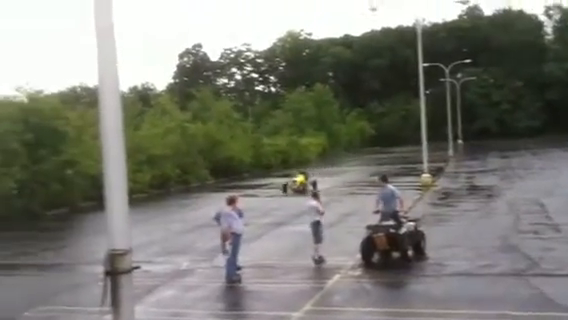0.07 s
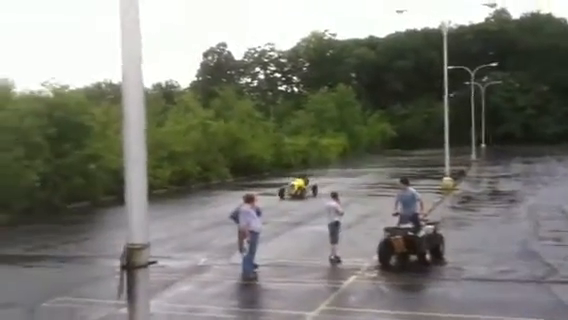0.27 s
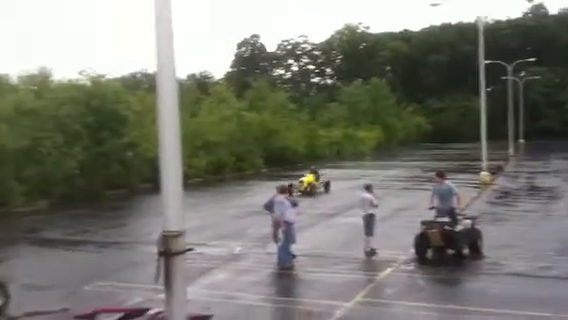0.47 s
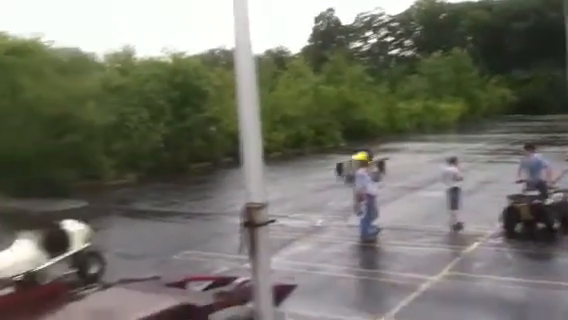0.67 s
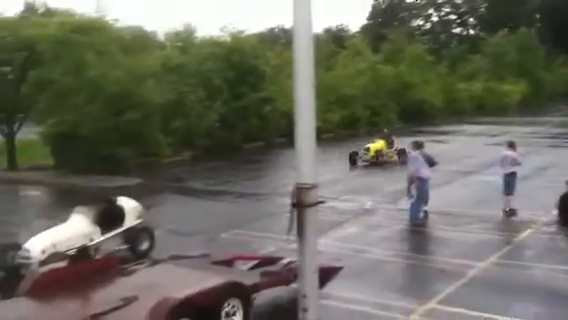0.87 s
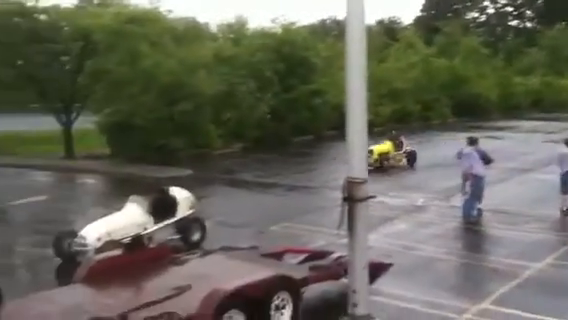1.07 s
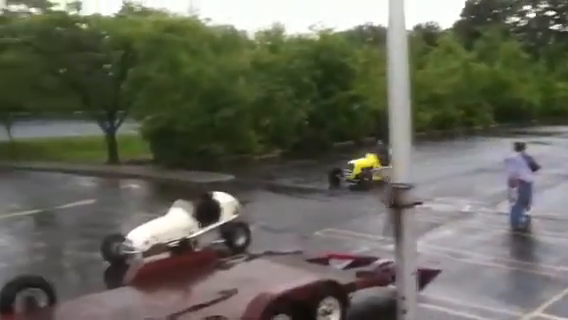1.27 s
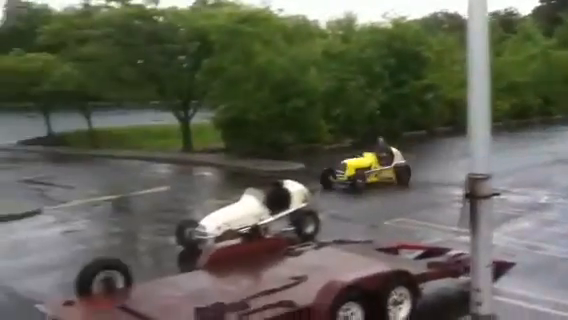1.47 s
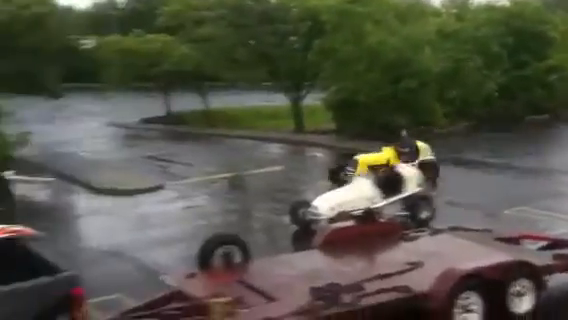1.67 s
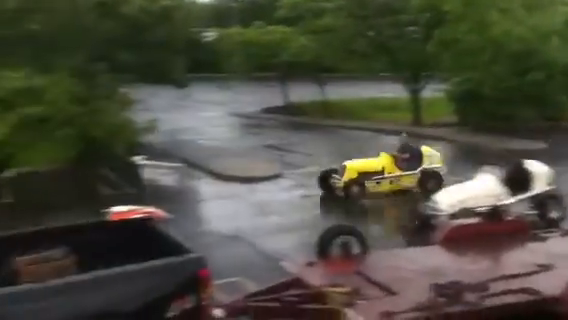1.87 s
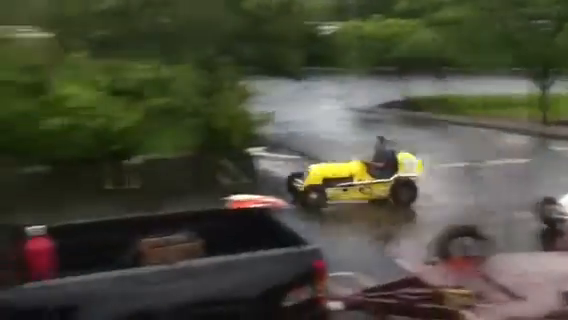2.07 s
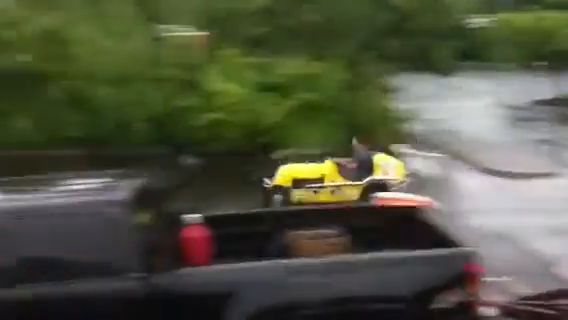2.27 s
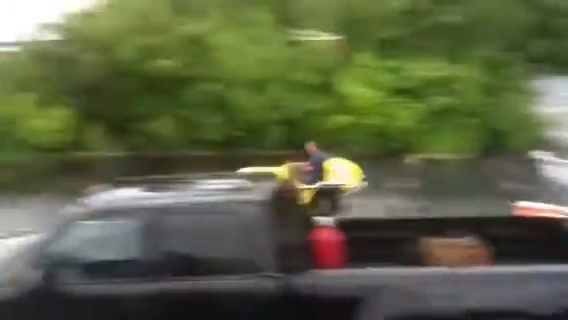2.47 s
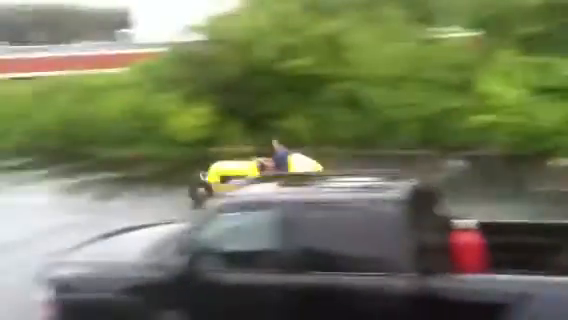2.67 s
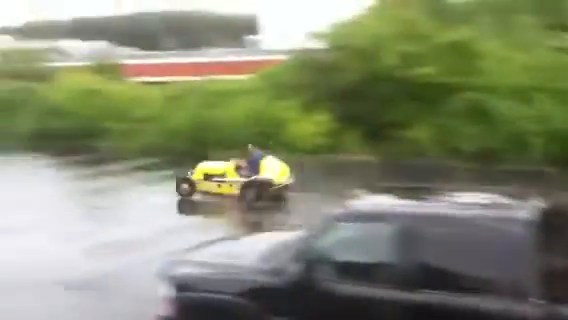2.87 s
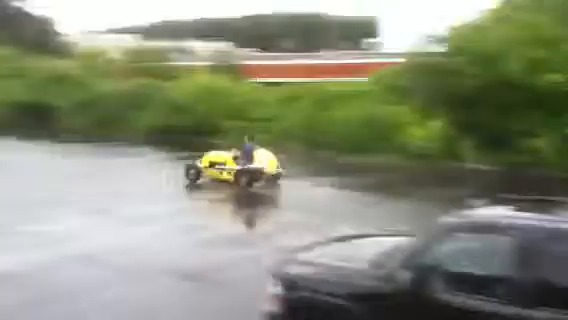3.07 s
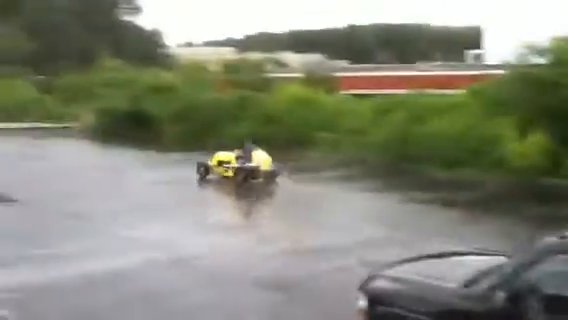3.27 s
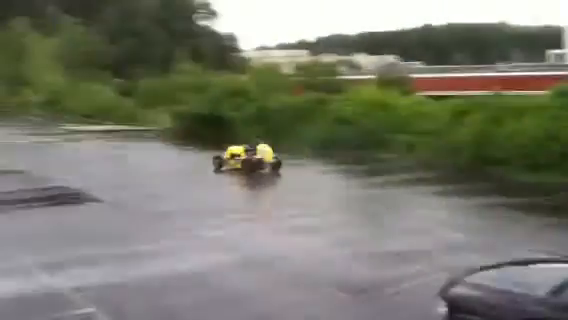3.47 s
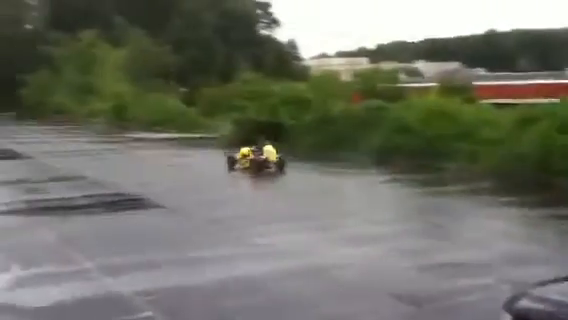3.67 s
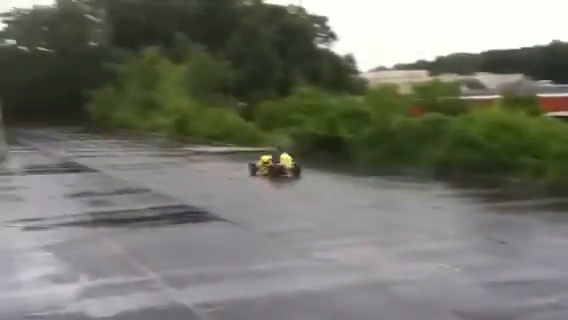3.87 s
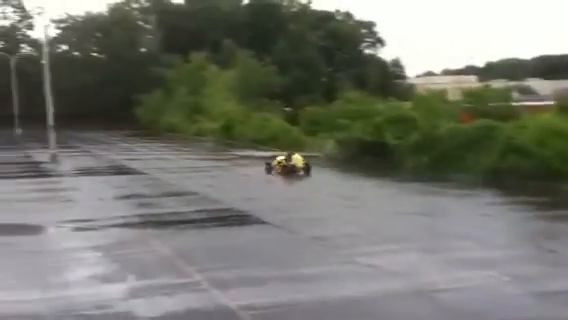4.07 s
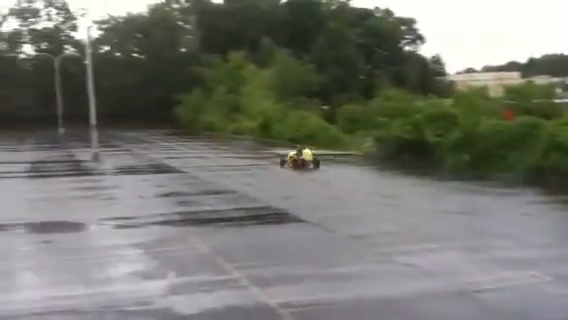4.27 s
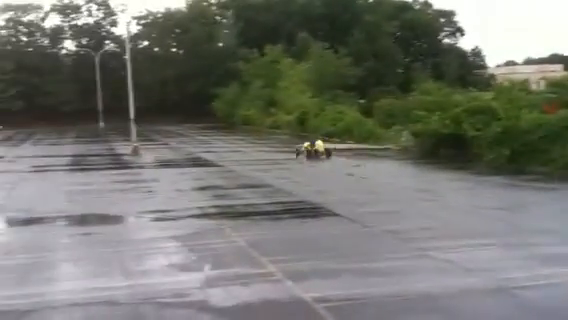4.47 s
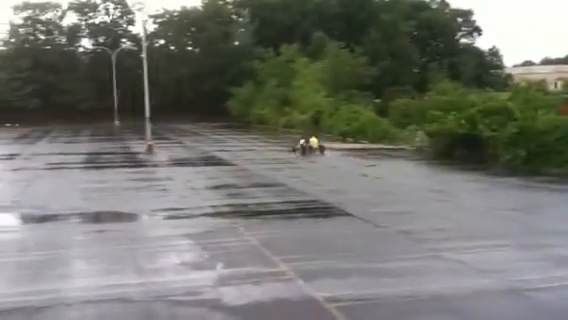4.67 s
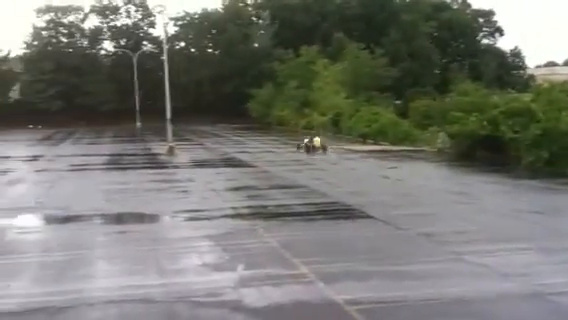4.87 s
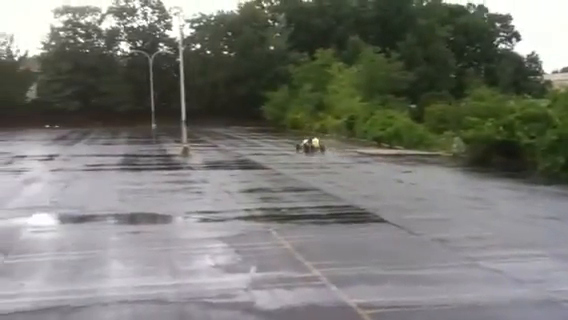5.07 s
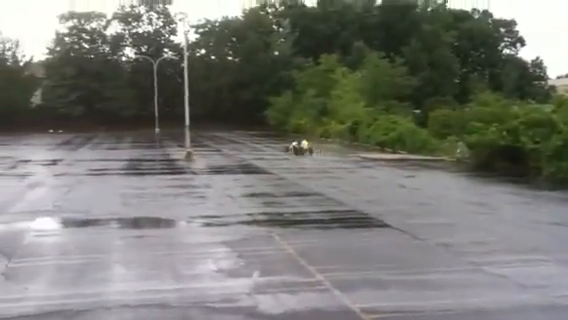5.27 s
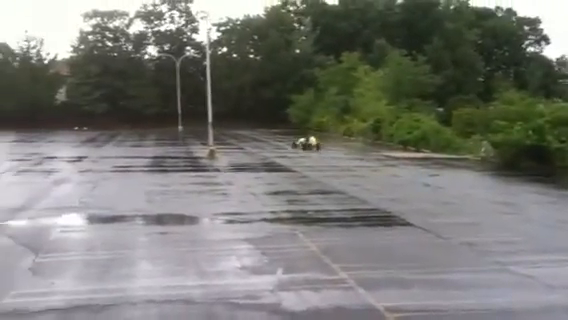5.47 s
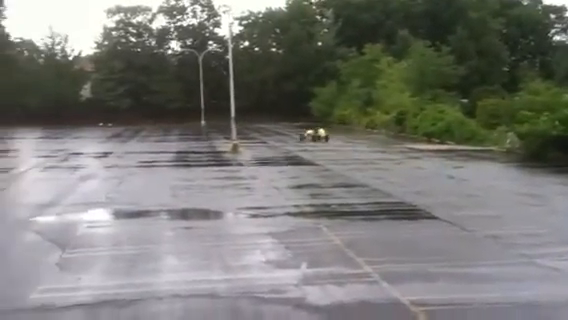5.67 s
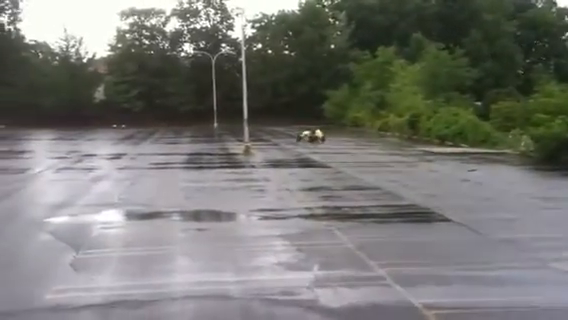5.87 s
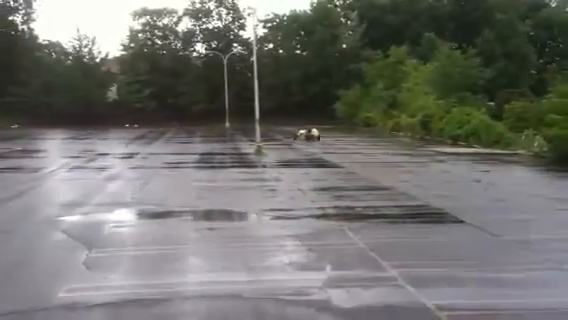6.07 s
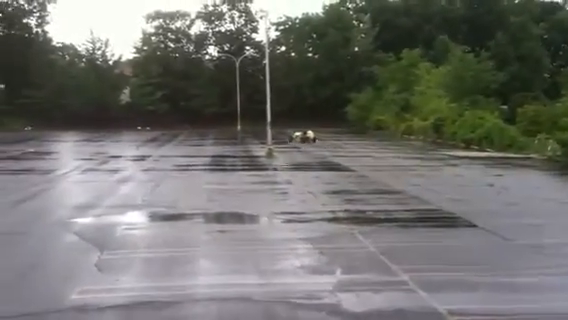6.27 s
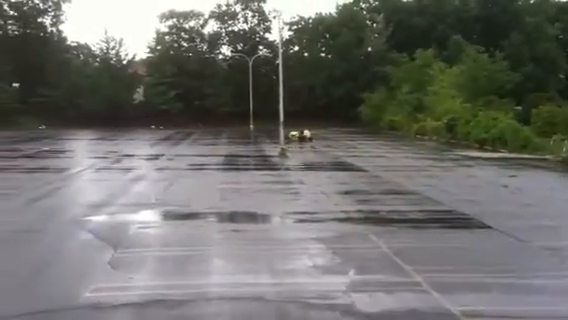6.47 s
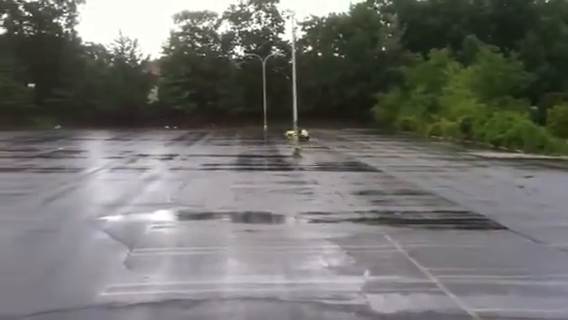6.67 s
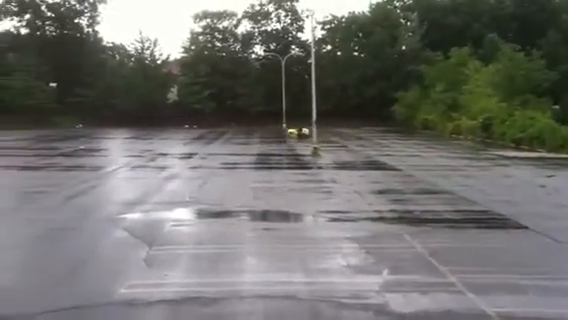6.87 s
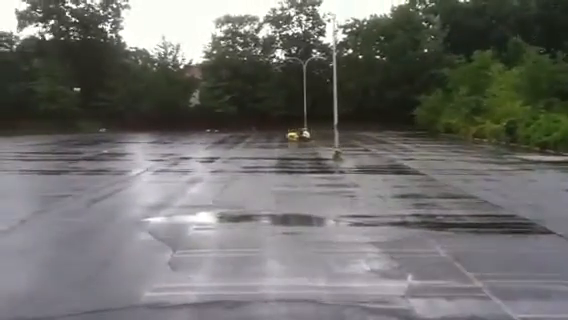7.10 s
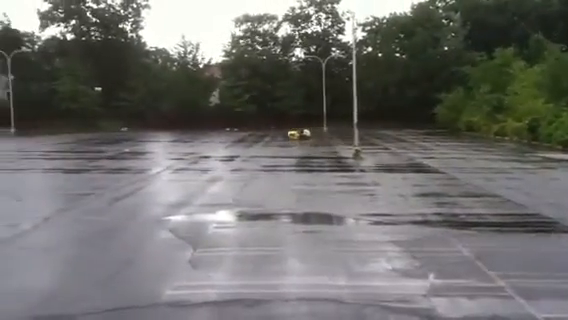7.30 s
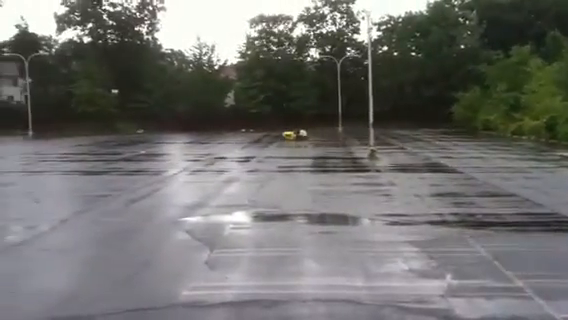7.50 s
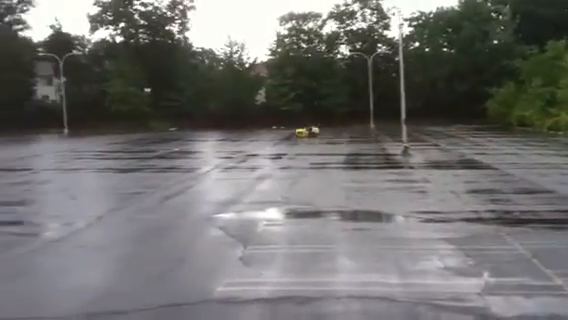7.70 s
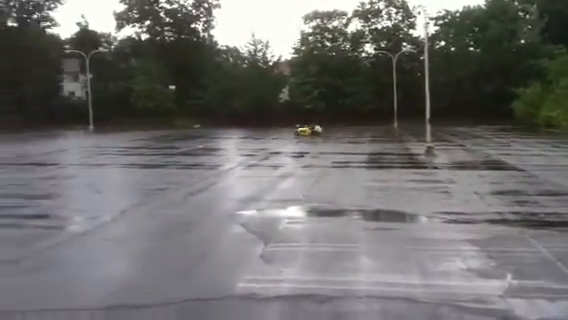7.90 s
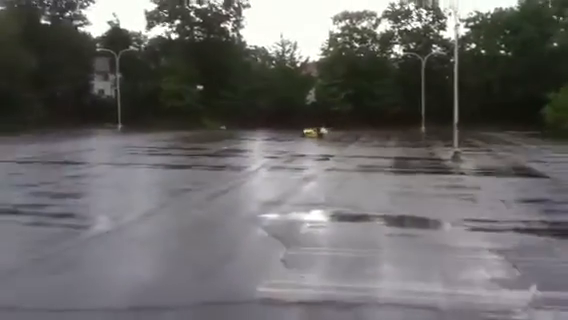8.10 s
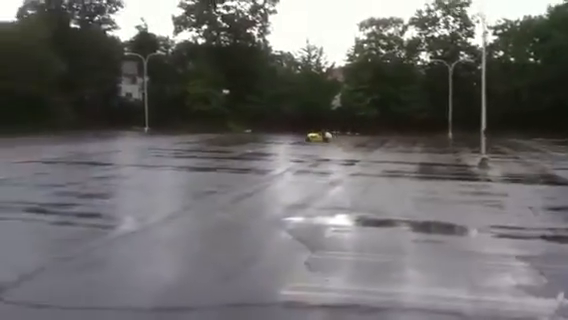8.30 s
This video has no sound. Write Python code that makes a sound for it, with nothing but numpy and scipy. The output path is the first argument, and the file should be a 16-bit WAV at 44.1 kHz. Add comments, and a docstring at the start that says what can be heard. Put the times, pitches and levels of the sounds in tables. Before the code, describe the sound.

A low, uneven exhaust note grows quickly, stumbles briefly, and snarls by at moderate distance, tyres hissing through water. A cluster of afterfire pops and a puddle slap follow. The engine drops in speed on a hollow, ragged overrun with thin metal tinks, settling into a quiet lumpy idle-like throb, tappets tapping and a faint whine. Open wet lot, mono, thin deep bass, short diffuse echoes.

```python
"""A small open race car with a lumpy eight-cylinder engine comes nearer on a wet, tree-lined parking lot.
It passes with rattling valve gear and hissing tyre spray, lifts off with pops in the exhaust, then burbles
away near idle with ticking tappets. Exhaust orders are summed cosines; rasp, ticks, spray and pops are
impulses and noise shaped by filters. Echoes and a ground reflection lead to one microphone, some way off."""
import sys
import numpy as np
from scipy import signal
from scipy.fft import rfft, irfft
from scipy.io import wavfile
from scipy.ndimage import uniform_filter1d

SR = 44100
rng = np.random.default_rng(int(sys.argv[2]) if len(sys.argv) > 2 else 0)


def wav_record(signal):
    """Record a signal, one row per channel, as 16-bit PCM in the file named by sys.argv[1]."""
    frames = np.transpose(np.atleast_2d(signal))
    bounded = np.clip(frames, -1, 1)
    # unit amplitude maps onto the largest positive 16-bit level
    quanta = np.round(bounded * 32767).astype(np.int16)
    wavfile.write(sys.argv[1], SR, quanta)


N = 367794
T = np.arange(N) / SR

# Engine speed as heard. Each row: time in seconds, four-stroke cycles per second.
ENGINE_SPEED = [(0.0, 14.15), (0.75, 15.04), (1.5, 15.92), (1.8, 16.13), (2.0, 15.85), (2.25, 15.84),
                (3.0, 15.61), (3.6, 14.54), (4.2, 13.97), (4.65, 13.38), (5.1, 13.13), (5.5, 12.19),
                (6.0, 10.24), (6.4, 10.02), (6.8, 10.03), (7.15, 9.88), (8.0, 9.97), (8.34, 10.05)]
RATE = np.interp(T, *np.transpose(ENGINE_SPEED))  # engine cycles per second
CYCLES = np.cumsum(RATE) / SR  # engine cycles so far
IDLE_CYCLES_PER_S = 10.4
REFERENCE_M = 14  # distance at which source levels and the ground detour are stated

# Cylinders in firing order. Each row: strength in dB, travel time down the header in ms.
CYLINDERS = [(-4, 0.34), (-3, 2.155), (-8, 1.764), (0, 2.42), (-8, 0.27), (0.5, 1.444), (2, 1.963),
             (-1, 3.94)]


def firings(jitter_s=0.00036, count=8):
    """Pulse train: unequal cylinder strengths and header delays make the beat lope."""
    k = np.arange(1, int(CYCLES[-1] * count))
    db, header_ms = np.array(CYLINDERS)[k % count].T
    times = np.interp(k / count, CYCLES, T) + header_ms / 1000
    return times + jitter_s * rng.standard_normal(len(k)), undb(db)


# Which note is heard. Each row: time in seconds, stage (0 coming, 1 pulling, 2 abreast, 3 passing,
# 4 leaving, 5 coasting, 6 distant; fractions blend neighbours).
STAGES = [(0, 0), (.7, 0), (1.25, 1), (1.75, 1), (2.05, 2), (2.28, 2), (2.48, 3), (2.95, 3), (3.45, 4),
          (3.95, 4), (4.25, 5), (5.3, 5), (5.85, 6)]
# Exhaust spectrum at each stage: relative dB of engine orders 4 to 28 (order 8 is the firing rate).
COMING = [-42, -19, -31, -24, -2, -17, -4.5, -7, -12.5, -6, -6, -5.5, 1.5, -3, -13.5, -2, -4, -12.5, -15,
          -16, -21.5, -31, -28, -35, -30.0]
PULLING = [-27, -14.5, -25.5, -17.5, -2, -10.5, -2.0, -4, -2, -2, -9, -6, -1.5, -7, -5, -9, -12, -11, -17,
           -11.5, -34, -34.5, -25.5, -24.5, -29]
ABREAST = [-29.5, -22.5, -37, -25, -5.5, -15.5, -5.5, -28, -2, -1, -5.0, -14.5, -7.5, -17, -16.5, -22.5,
           -27.5, -22.0, -23.5, -26.5, -28, -31, -33, -39.5, -35]
PASSING = [-21, -12.5, -30.5, -22, -2, -6.0, -2.5, -11.5, -0.5, -0.5, -7, -25.5, -15.5, -23, -24, -29, -24,
           -24.5, -16.5, -35, -22.5, -40, -38.0, -30, -40.5]
LEAVING = [-43, -42.0, -32, -20, -7.5, -17.5, -8, -14.5, -11.5, -12.5, -3.0, -4, -6, -0.5, -5, -11.0, -13.5,
           -25.5, -16, -33.0, -25.5, -43, -26.5, -22, -32.5]
COASTING = [-49, -32.0, -32, -31, -6.5, -5.5, -0.5, -18.5, -14.5, -4.5, -10, -4, -10.5, -1.5, 0.5, 1, -9.5,
            -7.5, -20, -22, -14.5, -18.5, -16, -33, -28.0]
DISTANT = [-53.0, -43.5, -47, -42.5, -20, -33, -21, -21.5, -34.5, -17, -21, -11.5, -6.5, -7.5, 0.0, -10.5,
           -9.5, -19, -15.5, -7.5, -9, -9.5, -15, -23.5, -18.5]
# Coasting, firings repeat only every second cycle: relative dB of half orders 7.5 to 25.5.
HALF_ORDERS = [-26.5, -16, -11.5, -7.5, -4, -14.5, -8, 1.5, -8.5, -1, -4, -2.5, -9.5, -15, -14.5, -21, -27,
               -17, -16]


def exhaust_note(pipe_ms=6, waver_db=2.5, count=8):
    """Fourier synthesis: wavering engine orders, their phases set by the firing pattern."""
    stage = curves(STAGES)[0]
    db, header_ms = np.transpose(CYLINDERS)
    arrival = np.arange(count) / count + (header_ms + pipe_ms) / 1000 * RATE[0]  # in turns
    spectra = zip(COMING, PULLING, ABREAST, PASSING, LEAVING, COASTING, DISTANT)
    orders = []
    for k, levels in enumerate(spectra, 4):
        orders.append((k, np.interp(stage, np.arange(len(levels)), undb(levels))))
    coasting = np.maximum(1 - np.abs(stage - 5), 0)
    for k, level in enumerate(HALF_ORDERS, 7):
        orders.append((k + .5, coasting * undb(level)))
    note, power = 0, 0
    for order, gain in orders:
        pattern = np.sum(undb(db) * np.exp(-2j * np.pi * order * arrival))
        gain = gain * undb(waver_db * drift())
        note = note + gain * np.cos(2 * np.pi * order * (CYCLES - 1) + np.angle(pattern))
        power = power + gain ** 2 / 2
    return note / np.sqrt(power)


# The two cylinder banks beat once a cycle. Each row: time in seconds, swing either way in dB,
# place of the swell in the cycle in turns.
LOPE = [(0, 1.1, 0.87), (1.6, 2, 0.94), (2.1, 1.7, 1), (2.33, 5.5, 1.08), (2.5, 1.1, 0.63),
        (2.75, 2.5, 0.72), (3.5, 0.6, 0.49), (5.0, 0.55, 0.73), (5.7, 0.58, 0.5), (6.2, 0.62, 0.65),
        (8.34, 0.54, 0.61)]


def lope():
    """Amplitude modulation: a throb that comes round once per engine cycle."""
    swing_db, place = curves(LOPE)
    return steady(undb(swing_db * np.cos(2 * np.pi * (CYCLES - place))))


# Uneven combustion, ragged when the throttle changes and on the overrun.
# Each row: time in seconds, amplitude share of the burble from 0 to 1.
RAGGED = [(0, .27), (.8, .35), (1.4, .52), (1.7, .67), (2.0, .6), (2.15, .35), (3.0, .38), (3.2, .75),
          (3.5, .27), (4.0, .3), (4.3, .56), (5.2, .56), (5.7, .72), (6.2, .58), (8.34, .53)]
# Pipe resonances: near, distant, and hollow on the overrun. Each row: frequency in Hz, gain in dB.
PIPE = [(30, -50), (60, -31), (90, -23.5), (120, -6.5), (165, -7), (200, 3), (245, -5), (305, -11.5),
        (350, -13.5), (400, -20.5), (450, -36), (600, -44), (1000, -84.5)]
PIPE_DISTANT = [(30, -37), (60, -33), (90, -13.5), (125, -7), (150, 1.5), (178, 0), (208, -7.5),
                (240, -1.5), (275, -9.5), (305, -11), (350, -17), (400, -20), (450, -45), (600, -34),
                (1000, -87)]
PIPE_HOLLOW = [(200, -34), (290, -11.5), (330, 2.5), (365, -9), (420, -17), (560, -23.5), (1000, -62.5)]


def exhaust(times, sizes, db, hollow_db=-13):
    """Periodic plus random excitation: a steady note, burble of uneven firings, hollow overrun resonance."""
    uneven = lot(clicks(times, sizes * rng.standard_normal(len(times))), echo_db=2.5)
    far = np.clip(curves(STAGES)[0] - 5, 0, 1)
    near_burble = (1 - far) * unit(colour(uneven, PIPE))
    far_burble = far * unit(colour(uneven, PIPE_DISTANT))
    burble = steady(near_burble + far_burble, span_s=0.11)
    share = np.clip(curves(RAGGED)[0], 0, .95)
    sound = np.sqrt(1 - share ** 2) * exhaust_note() + share * burble
    hollow = undb(hollow_db) * overrun() * steady(colour(uneven, PIPE_HOLLOW))
    return steady((sound + hollow) * lope()) * undb(db)


# Upper ring of the pipe. Each row: frequency in Hz, gain in dB.
RASP = [(150, -43.5), (300, -23.5), (430, 4.5), (560, 2), (680, 6), (860, -0.5), (1020, -26), (1500, -34.5),
        (4000, -39), (12000, -78.5)]


def rasp(pulses, db, gas_share=1.27, bark_db=-2, hard_db=-1.5, hard_place=.47):
    """Resonance and turbulence: the pipe's upper ring with a puff of gas after each firing."""
    blast = unit(pulses) + gas_share * unit(fade(pulses, decay_s=0.0061) * noise())
    # one cylinder barks louder
    hard = undb(hard_db) * unit(beats(hard_place, scatter_db=0))
    throat = [(400, -46.5), (680, 0.5), (780, -2.0), (900, -3.0), (1050, -24.5), (2000, -47.0)]
    bark = unit(colour(blast + hard, throat))
    # the throaty band opens while the tailpipe points at the listener
    facing = np.interp(T, [1.9, 2.3, 2.75, 3.1, 6.8, 7.8], [0.3, 0.85, 2.0, 0, 0.66, 0.6])
    sound = unit(colour(blast, RASP)) + undb(bark_db) * facing * bark
    return steady(lot(ground(sound, bounce=0.02), echo_db=-1.5)) * undb(db)


def chuff(near_db=2.0, far_db=3.0, place=0.53):
    """Amplitude modulation: dB swing of the upper ring once a cycle, deepest near idle."""
    swing_db = np.where(RATE < IDLE_CYCLES_PER_S, far_db, near_db)
    return swing_db * np.cos(2 * np.pi * (CYCLES - place))


# A bright snarl as the car sweeps by. Each row: centre time in seconds, length in seconds, level in dB,
# centre in Hz, glide in Hz per second, width in Hz, places of the hardest and the second hardest spit
# in the cycle in turns.
SNARLS = [(1.383, .7, -70, 2303, -400, 1090, .40, 0.17), (1.702, .35, -64, 1847, -1300, 800, .40, 0.19),
          (2.25, .4, -65, 2000, -600, 1100, .46, .87), (2.9, .7, -61, 2010, -200, 370, .12, .89),
          (2.92, 0.36, -70, 2805, -200, 300, 0.18, .89), (3.7, .55, -72.5, 2080, -200, 785, .59, 0.45),
          (5.062, 0.19, -77, 1985, -0.5, 1410, 0.65, 0.43)]


def snarl(pulses, gate_s=0.0056, second_db=-2, others_db=-6, scatter_db=-1.5, order=2):
    """Gliding resonance: gas noise gated by firings, two cylinders spitting harder than the rest."""
    out = 0
    for s, length, db, hz, glide, width, first, second in SNARLS:
        low_pass = signal.butter(order, width / 2, fs=SR, output="sos")
        band = unit(signal.sosfilt(low_pass, noise()))
        gate = unit(beats(first, scatter_db)) + undb(second_db) * unit(beats(second, scatter_db))
        gate = gate + undb(others_db) * unit(pulses)
        centre = hz + glide * np.clip(T - s, -length, length)
        carrier = np.cos(2 * np.pi * np.cumsum(centre) / SR)
        swell = np.exp(-(2 * (T - s) / length) ** 2)
        out = out + undb(db) * swell * unit(band * puff(gate, decay_s=gate_s) * carrier)
    return lot(out, echo_db=-10.5)


# Short dry spits from the exhaust, many once per engine cycle.
# Each row: time in seconds, drive in dB, nominal pitch in Hz.
SPITS = [(1.663, -61, 2080), (1.801, -58, 1530), (2.057, -49.5, 1660), (2.118, -48.5, 1680),
         (2.183, -60, 1840), (2.24, -50.5, 1640), (2.298, -53.5, 1460), (2.476, -55, 1450),
         (2.608, -55.5, 990), (2.652, -55, 2100), (2.972, -58, 1840), (3.051, -48.5, 1590),
         (3.1, -59, 2050), (6.657, -62, 1970), (6.755, -63, 1950)]


def spits():
    """Enveloped noise: short band-shaped bursts from the exhaust."""
    out = 0
    for s, db, hz in SPITS:
        outline = [(hz / 3, -40), (hz * 0.92, -8), (hz, 0), (hz * 0.94, -8), (hz * 2, -24),
                   (hz * 5, -55), (hz * 8, -80)]
        band = unit(colour(noise(), outline))
        out = out + undb(db) * band * puff(clicks(np.array([s]), np.ones(1)), decay_s=0.016)
    return out


# Unburnt fuel popping in the pipe. Each row: time in seconds, then crack, bark and thump drive in dB.
POPS = [(2.012, -69, -82.5, -48), (2.897, -55, -73, -56), (2.924, -55, -61, -47), (3.128, -65, -50.5, -40),
        (3.139, -54, -68, -25.5), (3.165, -75, -63, -27), (3.233, -56, -54, -51),
        (3.268, -59.5, -67, -28.5), (3.301, -58, -70, -50), (3.339, -54, -58, -23.5),
        (3.365, -62, -57, -38), (4.103, -73, -58.5, -31), (4.237, -69, -55, -34.5), (4.318, -68, -67, -38),
        (4.463, -63, -55.5, -28), (4.61, -73, -58, -34), (5.062, -66, -61, -53), (5.205, -69, -62, -45),
        (5.367, -76, -60.5, -50), (5.563, -70, -59, -46)]
# Spectrum of the crack. Each row: frequency in Hz, gain in dB.
CRACK = [(700, -4.5), (2000, 13.5), (3600, 1.5), (5400, 9), (6800, 1), (9200, 7.5), (10500, -23),
         (15000, -29)]


def pops(rise_s=0.00058):
    """Impulsive combustion: each afterfire flares at the tailpipe, barks and thumps the pipe."""
    s, crack_db, bark_db, thump_db = np.transpose(POPS)
    flare = uniform_filter1d(fade(clicks(s, undb(crack_db)), decay_s=0.0048), int(2 * rise_s * SR))
    crack = flare * unit(colour(noise(), CRACK))
    body = [(50, -34), (110, -30.0), (145, 11.5), (185, -5), (225, 4.0), (280, -12.0), (345, -9),
            (410, -23), (600, -40.5), (1000, -55.5), (4000, -100)]
    note = colour(np.eye(1, N)[0], body)  # impulse response of the pipe
    thump = signal.fftconvolve(clicks(s, undb(thump_db)), note / np.max(np.abs(note)))[:N]
    mouth = [(300, -19.5), (480, -0.5), (700, -4), (1050, -19), (2000, -18.0), (3500, -19.5), (8000, -54.5)]
    bark = puff(clicks(s, undb(bark_db)), decay_s=0.012) * unit(colour(noise(), mouth))
    return lot(crack + bark + thump, echo_db=-6.5)


# The pipe rings after the hardest pops. Each row: start in seconds, level in dB, pitch in Hz, T60 in seconds.
BOOMS = [(2.011, -30.5, 147.4, 0.31), (2.02, -33, 268, 0.4), (3.135, -33, 360.5, 0.27),
         (3.34, -31, 331.3, .24), (4.46, -36.5, 334, 0.18)]


def booms(rise_s=0.0052):
    """Free decay: a short hollow pipe ring as an exponentially damped sine."""
    out = 0
    for s, db, hz, t60 in BOOMS:
        age = np.maximum(T - s, 0)
        envelope = undb(db - 60 * age / t60) * (1 - np.exp(-age / rise_s))
        out = out + envelope * np.sin(2 * np.pi * hz * age)
    return out


# Valve gear spectrum. Each row: frequency in Hz, gain in dB.
VALVES = [(400, -31.5), (800, -28.5), (1050, -2.5), (1500, 1.5), (2050, 3.5), (2450, -5), (2800, -2.5),
          (3400, -11.5), (5000, -42.5), (10000, -31.5), (12000, -61)]


def valve_gear(times, sizes, db, scatter_db=3, whirr_db=-1.0, block_db=-8):
    """Impact noise: a metallic tick with each firing, over the whirr of the engine."""
    strength_db = scatter_db * np.clip(rng.standard_normal(len(times)), -2, 2)
    ticks = clicks(times + .004, sizes * undb(strength_db))
    sound = unit(fade(ticks, decay_s=0.0035) * noise()) + undb(whirr_db) * noise()
    # a brighter ring of the block is heard from behind the car
    block = [(1500, -48.0), (2450, 11.5), (2750, 12.0), (3050, -21.5), (5000, -50.5)]
    ring = unit(colour(sound, block))
    behind = np.interp(T, [2.5, 3.6, 4.4, 5.4], [0, 1, 1, 0])
    sound = unit(colour(sound, VALVES)) + undb(block_db) * behind * ring
    return steady(lot(ground(sound, bounce=0.17), echo_db=-9)) * undb(db)


# Loose tappets are plain at idle and vanish as the revs rise.
TAPPET_DB, TAPPET_DB_PER_CYCLE_RATE = -74.5, 16  # drive at idle in dB; loss in dB per extra cycle per second
# Tappet strikes. Each row: place in the cycle in turns, strength in dB.
TAPS = [(.09, -3.5), (0.335, -1.5), (.47, -6), (.71, -5.5)]


def tappets(scatter_db=2.0, knock_db=-0.5, knock_place=0.3):
    """Impact excitation: loose valves tap the rocker cover each cycle, joined by a duller knock."""
    taps = sum(undb(db) * beats(place, scatter_db) for place, db in TAPS)
    strike = unit(taps) + 1.1 * unit(fade(taps, decay_s=0.0053) * noise())
    cover = colour(strike, [(800, -45.0), (1600, -13.5), (1900, 1.5), (2080, 6.5), (2400, -23),
                            (2750, -6), (4000, -31.5)])
    thuds = fade(beats(knock_place, scatter_db=1.5), decay_s=0.0086) * noise()
    knock = colour(thuds, [(400, -33), (600, -7), (790, 0), (900, -20), (1050, -12.5),
                           (1500, -13.5), (3000, -50)])
    facing = np.interp(T, [6.8, 7.5], [.7, 1.2])  # the knock opens up as the car turns side-on
    sound = lot(steady(cover) + undb(knock_db) * facing * unit(knock), echo_db=-7.5)
    above_idle = np.maximum(RATE - IDLE_CYCLES_PER_S, 0)
    return sound * undb(TAPPET_DB - TAPPET_DB_PER_CYCLE_RATE * above_idle)


# Spray spectrum. Each row: frequency in Hz, gain in dB.
SPRAY = [(1500, 0), (3000, 2.5), (4200, -2), (5800, 2), (6500, -2.5), (7600, 0), (9000, -5), (10500, -11.5),
         (11800, -37.5), (15000, -37.5)]


def tyre_spray(db, drops_per_s=700, scatter_db=7.5, hiss_db=3, splash_db=1.9, puddle_db=5, wet_db=1.5):
    """Random droplet impacts: water flung off the tyres, in fluctuating sheets when the car is near."""
    draws = rng.random((int(drops_per_s * N / SR), 2)).T
    drops = clicks(draws[0] * N / SR, undb(-scatter_db * np.log(draws[1] + 0.01)))
    sound = unit(fade(drops, decay_s=0.0031) * noise()) + undb(hiss_db) * noise()
    sheets = unit(uniform_filter1d(uniform_filter1d(noise(), int(0.006 * SR)), int(0.0036 * SR)))
    near = np.interp(T, [2.6, 2.9, 3.05, 3.4], [0, 1, 1, 0])
    # the tyres run from a drier strip into standing water
    wet = np.interp(T, [1.3, 1.94, 1.98, 2.4], [0, -.6, .5, 0])
    level_db = db + wet_db * wet + near * (puddle_db + splash_db * sheets)
    return unit(colour(sound, SPRAY)) * undb(level_db)


# A tyre slaps through a puddle. Each row: time in seconds, drive in dB.
SPLASHES = [(3.139, -54.5), (3.234, -62), (5.553, -66), (5.729, -64)]
# Spectrum of the slap. Each row: frequency in Hz, gain in dB.
SPLASH = [(3000, -26), (4600, -9), (5200, 0.5), (6000, -2), (7500, -16), (12000, -41)]


def splashes(decay_s=0.0066):
    """Enveloped noise: short bright slaps of water."""
    s, db = np.transpose(SPLASHES)
    return puff(clicks(s, undb(db)), decay_s=decay_s) * unit(colour(noise(), SPLASH))


# A small loose metal part tinks as the car jolts. Each row: time in seconds, drive in dB.
TINKS = [(4.103, -62.5), (4.237, -71), (4.318, -74), (4.612, -65), (4.762, -64), (4.915, -70),
         (6.002, -68.5), (6.105, -74), (6.396, -67), (6.696, -67), (6.795, -72), (6.895, -72)]
# Spectrum of the tink. Each row: frequency in Hz, gain in dB.
TINK = [(5000, -22), (7100, -16), (7700, -1), (8200, -8), (8800, 0), (9400, -0.5), (9900, -23),
        (12000, -40)]


def tinks(decay_s=0.0044):
    """Enveloped noise: thin, crisp metallic ticks."""
    s, db = np.transpose(TINKS)
    return puff(clicks(s, undb(db)), decay_s=decay_s) * unit(colour(noise(), TINK))


def whine(hz=613, db=-71.0):
    """Frequency modulation: a faint wavering whine as the car turns at the far end."""
    waver = unit(uniform_filter1d(noise(), int(0.03185 * SR)))
    swell = np.interp(T, [6.7, 7.4, 8.0, 8.34], [0.24, 0.92, 0.86, 0.25])
    tone = np.sin(2 * np.pi * np.cumsum(hz * (1 + 0.02 * waver)) / SR)
    return undb(db) * swell * unit(tone)


def snap(db=-31):
    """Exponential decay: one brief dry click."""
    when = np.array([2.4208])
    return -fade(clicks(when, undb([db])), decay_s=0.0013)


# Spectrum of the open air. Each row: frequency in Hz, gain in dB.
AIR = [(240, -27.5), (400, -18), (700, -5.5), (1020, -9.5), (2000, -11), (3500, -15), (5700, -18),
       (9000, -25), (12000, -29), (15500, -42.5)]


def open_air(db=-71):
    """Stationary noise: the faint even hiss of the wet surroundings."""
    return unit(colour(noise(), AIR)) * undb(db)


LOT_T60_S = 0.39


def lot(x, echo_db):
    """Diffuse reverberation: scattered echoes from parked trucks and the tree line."""
    t = T[:SR]
    tail = rng.standard_normal(SR) * np.exp(-np.log(1000) * t / LOT_T60_S) * (t > .02)
    return x + undb(echo_db) * signal.fftconvolve(x, tail / np.linalg.norm(tail))[:N]


# The drive. Each row: time in seconds, distance in metres, throttle from 0 to 1.
DRIVE = [(0, 46.4, 0.71), (.9, 32.2, 0.64), (1.35, 27.8, 1), (1.75, 21.5, 0.44), (2.15, 13.2, 0.14),
         (2.6, 15.4, 0.35), (3.05, 16.6, 0.35), (3.55, 26.6, 0.11), (4.5, 31.2, 0), (5.5, 41, 0),
         (6.1, 59, 0.54), (7.2, 55.6, 0.36), (8.34, 71, 0.47)]


def ground(x, bounce, detour_ms=0.763):
    """Comb filtering: wet asphalt mirrors the sound, its delay growing as the car comes near."""
    lag_s = detour_ms / 1000 * REFERENCE_M / curves(DRIVE)[0]
    return x + bounce * np.interp(T - lag_s, T, x)


def heard(reference_db, load_db, loss_db):
    """Spreading loss: level in dB shifts with throttle and falls with each doubling of distance."""
    metres, throttle = curves(DRIVE)
    return reference_db + load_db * throttle - loss_db * np.log2(metres / REFERENCE_M)


# On the overrun every second cycle fires hard.
HUNT_FROM_S, HUNT_TO_S, HUNT_FADE_S, HUNT_PEAK_S, HUNT_DB = 4.12, 5.9, 0.25, 4.482, 0.5


def overrun():
    """Gating: 1 while the car coasts away and the wheels drive the engine, with ramps from and to 0."""
    return np.clip(np.minimum(T - HUNT_FROM_S, HUNT_TO_S - T) / HUNT_FADE_S, 0, 1)


def hunting():
    """Subharmonic modulation: dB swing of the surge every second cycle on the overrun."""
    return HUNT_DB * overrun() * np.cos(np.pi * (CYCLES - np.interp(HUNT_PEAK_S, T, CYCLES)))


def swells(table):
    """Gaussian envelope: a bell in dB for each row of centre time, length in seconds and dB."""
    return sum(db * np.exp(-(2 * (T - s) / length) ** 2) for s, length, db in table)


def beats(place, scatter_db):
    """Periodic impulses: one per engine cycle at a place in turns, each with its own strength."""
    turns = np.arange(int(CYCLES[-1]) + 1) + place
    sizes = undb(scatter_db * np.clip(rng.standard_normal(len(turns)), -1.5, 1.5))
    return clicks(np.interp(turns, CYCLES, T), sizes)


def drift(step_s=0.24):
    """Interpolated randomness: a slow wander with a spread near 1."""
    return np.interp(T / step_s, np.arange(256), rng.standard_normal(256))


def clicks(times, sizes):
    """Impulse excitation: one impulse at each time."""
    inside = (times >= 0) & (times < (N - 1) / SR)
    return np.bincount((times[inside] * SR).astype(int), sizes[inside], N)


def fade(x, decay_s):
    """Exponential decay: a tail on each impulse, by a one-pole filter."""
    return signal.lfilter([1], [1, -np.exp(-1 / (decay_s * SR))], x + 1e-18)


def puff(x, decay_s, rise_s=.0014):
    """Smoothed decay: a soft attack and an exponential tail on each impulse."""
    return uniform_filter1d(fade(x, decay_s), int(rise_s * SR))


def noise():
    """White noise: independent Gaussian samples."""
    return rng.standard_normal(N)


def colour(x, points, size=8192):
    """Minimum-phase filtering: a causal filter with the given (Hz, dB) outline, by its cepstrum."""
    hz, db = np.transpose(points)
    outline = np.interp(np.log(np.fft.rfftfreq(size, 1 / SR) + 1), np.log(hz), db)
    cepstrum = irfft(np.log(undb(outline)))
    # fold negative time onto positive time
    cepstrum[1:size // 2] *= 2
    cepstrum[size // 2 + 1:] = 0
    return signal.fftconvolve(x, irfft(np.exp(rfft(cepstrum))))[:N]


def unit(x):
    """Normalisation: scale to rms 1."""
    return x / np.sqrt(np.mean(x ** 2))


def steady(x, span_s=0.73):
    """Running normalisation: local rms near 1, by default over several engine cycles to keep their throb."""
    size = int(span_s * SR)
    power = uniform_filter1d(uniform_filter1d(x ** 2, size), size // 2)
    return x / np.sqrt(power + 1e-18)


def curves(table):
    """Linear interpolation: each column of a table after its first, joined by straight lines in time."""
    s, *columns = np.transpose(table)
    return [np.interp(T, s, c) for c in columns]


def undb(db):
    """Logarithmic level: decibels to amplitude gain."""
    return 10 ** (np.asarray(db) / 20)


# The engine stumbles. Each row: centre time in seconds, length in seconds, depth in dB.
STUMBLES = [(1.945, 0.1, 8.5), (3.09, 0.039, 5.5), (3.225, 0.073, 4.5)]
# It catches with a surge. Each row: centre time in seconds, length in seconds, gain in dB.
SURGES = [(1.47, 0.14, 3), (1.66, 0.046, 3.5), (1.84, 0.094, 1), (2.05, 0.12, 3), (2.2, 0.11, 2)]


def scene():
    """Superposition: the car's sources and one brief click, each at its own level, in the open air."""
    times, sizes = firings()
    pulses = clicks(times, sizes)
    stumble_db = swells(STUMBLES)
    effort_db = swells(SURGES) + hunting() - stumble_db
    exhaust_db = heard(reference_db=-32, load_db=-.5, loss_db=6) + effort_db
    rasp_db = heard(reference_db=-62.5, load_db=12, loss_db=6) + 0.73 * effort_db + chuff()
    valve_db = heard(reference_db=-62.5, load_db=6.5, loss_db=10.5) - 0.89 * stumble_db
    spray_db = heard(reference_db=-68, load_db=1.8, loss_db=8)
    snarl_gain = undb(-0.65 * stumble_db)
    pipes = exhaust(times, sizes, exhaust_db) + rasp(pulses, rasp_db)
    pipes = pipes + snarl_gain * snarl(pulses) + spits() + pops() + booms()
    machinery = valve_gear(times, sizes, valve_db) + tappets() + tinks() + whine()
    water = tyre_spray(spray_db) + splashes()
    return (pipes + machinery + water + snap() + open_air())[None]


def record(dry):
    """Band limitation: the small microphone thins the deep bass and cuts the top."""
    thin = signal.sosfilt(signal.butter(2, 40, "high", fs=SR, output="sos"), dry)
    return signal.sosfilt(signal.ellip(8, .2, 70, 15600, fs=SR, output="sos"), thin)


dry = scene()
out = record(dry)
wav_record(out)
```